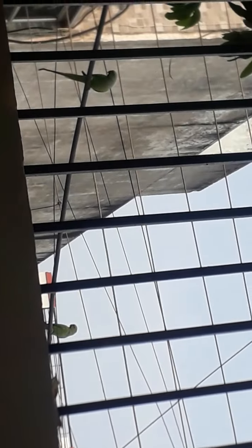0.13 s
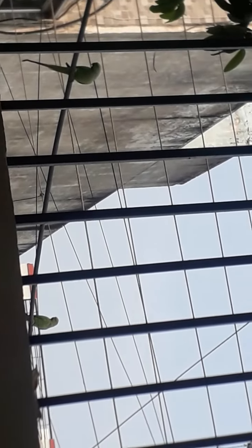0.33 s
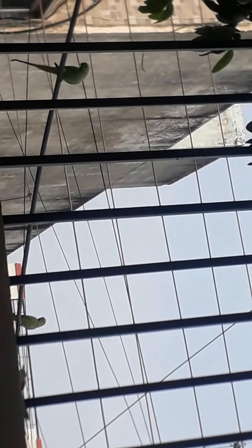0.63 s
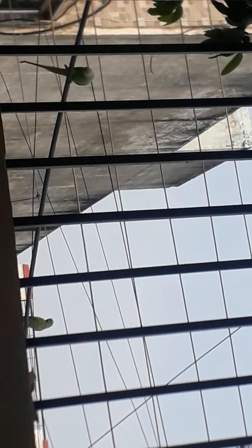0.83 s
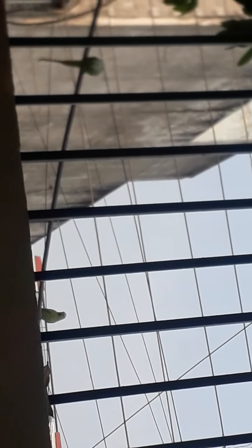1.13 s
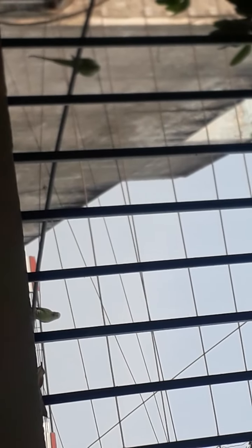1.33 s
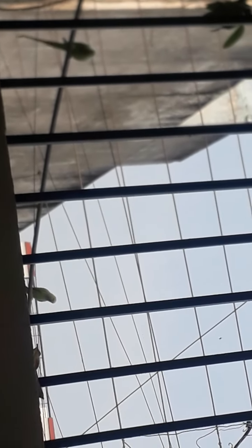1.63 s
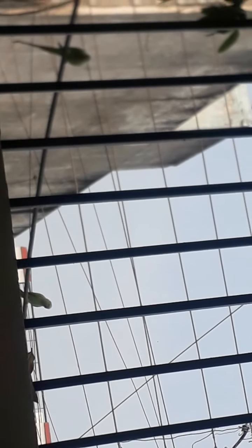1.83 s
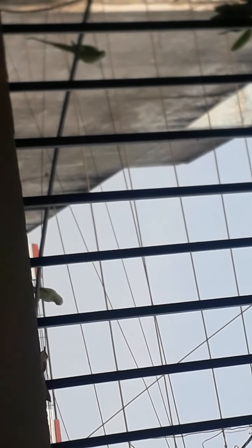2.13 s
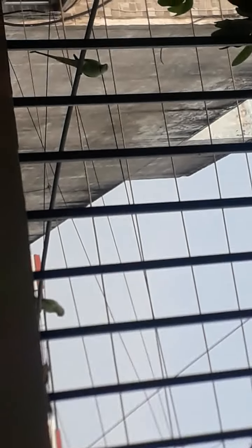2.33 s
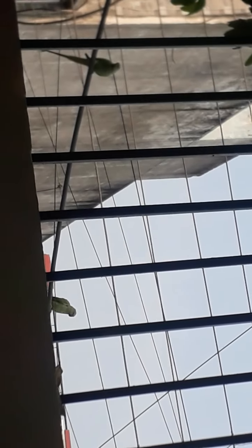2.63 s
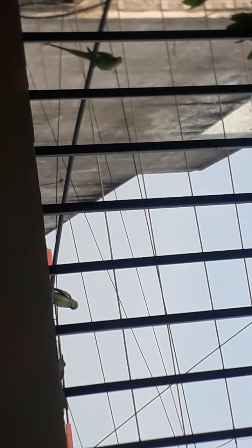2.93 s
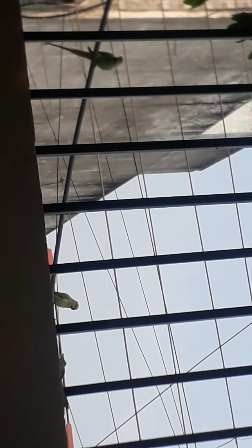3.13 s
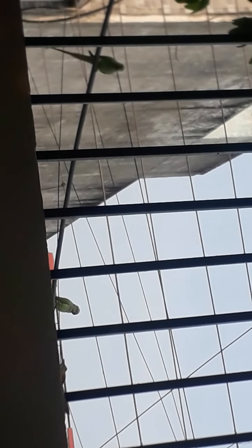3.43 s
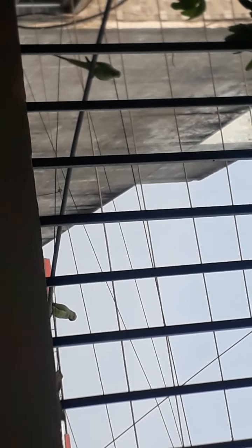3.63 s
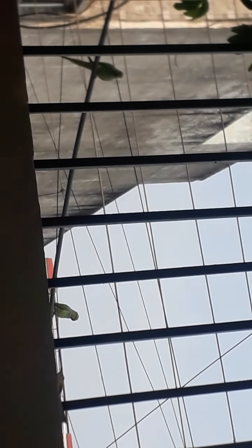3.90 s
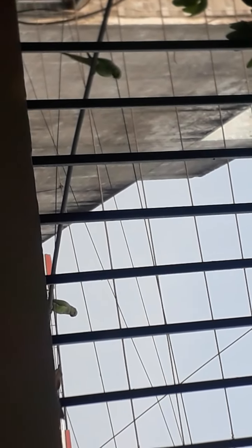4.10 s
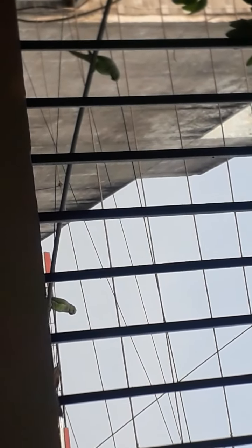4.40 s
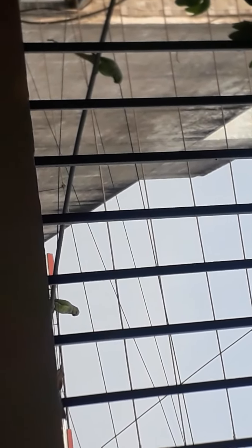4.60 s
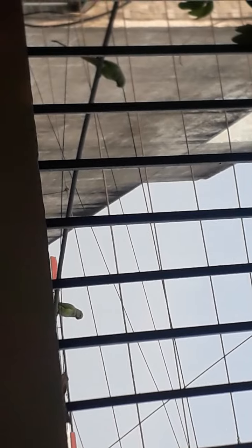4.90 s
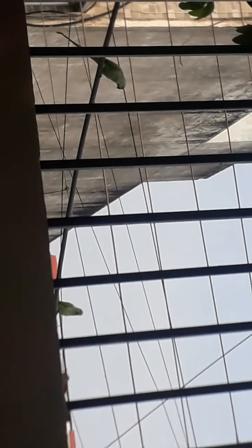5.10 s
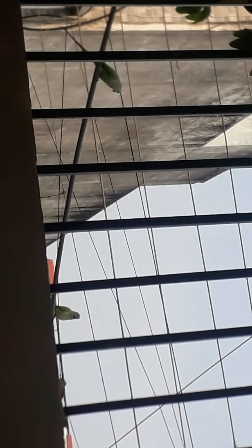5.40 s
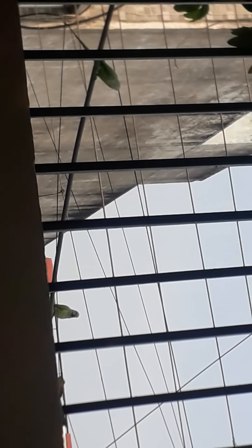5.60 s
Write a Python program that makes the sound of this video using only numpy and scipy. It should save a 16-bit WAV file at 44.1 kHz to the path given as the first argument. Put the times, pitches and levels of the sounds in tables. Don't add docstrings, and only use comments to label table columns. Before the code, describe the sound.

A parakeet gives harsh, shrill squawks in quick runs, ringing off concrete walls over a low town rumble with passing cars.

```python
import sys
import numpy as np
from scipy import signal
from scipy.fft import rfft, irfft
from scipy.io import wavfile
from scipy.ndimage import uniform_filter1d

SR = 44100
rng = np.random.default_rng(int(sys.argv[2]) if len(sys.argv) > 2 else 0)


def gain_from_db(level_db):
    decades = np.asarray(level_db, float) / 20
    return 10 ** decades


def transcribe(u):
    v = np.clip(np.atleast_2d(u).T, -1, 1)
    q = np.round(v * 32767).astype(np.int16)
    wavfile.write(sys.argv[1], SR, q)


N = 253575
TIME = np.arange(N) / SR

# f/Hz, level/dB per Hz
WASH_COLOUR = [(22, -26), (40, -7), (55, -11), (85, 3.5), (200, -7), (500, -16), (1200, -6.5), (2400, -14),
               (3000, -20), (4500, -24.5), (6200, -21.5), (7800, -38), (10000, -36.5), (15500, -31.5)]
# f/Hz, level/dB per Hz
TYRE_COLOUR = [(90, -20), (180, -0.5), (500, -6), (900, -10), (2000, -54)]
# t/s, rise/dB, half length/s
CARS = [
    (.4, 2.5, 0.15),
    (1.75, 1.5, 0.27),
    (2.7, 5.5, 0.34),
    (3.302, 2.5, 0.37),
    (4.4, 5, 0.38),
    (5.15, 3.5, 0.21),
]
# f/Hz, level/dB
SHAFT_TONES = [(954, -69), (1168.5, -64), (2337, -64)]
# f/Hz, level at full load/dB
LOAD_TONES = [(2950, -76), (3327, -74), (3505, -75), (3637, -65), (3702, -66.5), (4678, -84)]
# t/s, level/dB
SHAFT_LOAD = [(.4, -4.5), (.85, -9.5), (1.0, -25), (1.2, -22), (2.1, -5.5), (2.8, -2), (3.6, -16),
              (5.4, -12), (5.55, -22)]
# f/Hz, level/dB per Hz
HISS_COLOUR = [(210, -49), (350, -31), (412, -3), (499, -16), (701, 1.5), (789, -2.5), (1810, 0),
               (4080, -14), (5700, -7), (6540, -7.5), (7930, -31.5), (12000, -49), (15600, -80),
               (22000, -120)]
# edge f/Hz, extra fall/dB per s
HISS_DULLING = (3200, 15.7)
# t of top pitch/s, top to end/s, top f/Hz, shelf f/Hz, effort level/dB
PLAIN_SQUAWKS = [
    (1.489, .109, 2573, 1929, -21),
    (1.812, 0.098, 2485, 1843, -23),
    (3.164, .119, 2632, 2192, -21.5),
    (3.452, 0.11, 2700, 2110, -21),
    (3.726, 0.11, 2585, 2053, -21),
    (3.997, 0.11, 2634, 2078, -21),
    (4.264, 0.11, 2585, 2024, -21),
    (4.764, .098, 2613, 2075, -22.5),
    (5.021, 0.11, 2583, 2018, -22),
    (5.611, .107, 2500, 2090, -21),
]
# t/s, f/Hz, effort level/dB
BROKEN_NOTES = [
    [(1.165, 883, -30), (1.172, 1416, -25.5), (1.183, 2273, -19.5), (1.196, 2670, -37)],
    [(1.199, 3760, -28), (1.208, 3610, -24), (1.217, 3600, -25)],
    [(1.217, 2697, -24), (1.24, 2630, -23), (1.262, 2250, -20), (1.279, 1927, -16), (1.291, 1830, -23),
     (1.308, 1425, -24)],
    [(2.8, 949, -34.5), (2.808, 1445, -33.5), (2.82, 2136, -20.5), (2.832, 2950, -22)],
    [(2.832, 3980, -22), (2.842, 4045, -20), (2.86, 4050, -22), (2.878, 4070, -18), (2.888, 4090, -19)],
    [(2.882, 2758, -28), (2.93, 2755, -24), (2.958, 2598, -26.5)],
    [(2.958, 2555, -25.5), (2.98, 2296, -28.5), (3.005, 2060, -30)],
]
BROKEN_RASP = [1.2, 1.6, 1.6, 1.2, .9, 1.5, 4]
# time before top/s, share of top f, level over effort/dB
CLIMB = [(.038, .41, -13), (.025, .68, -10), (.016, .91, 2.5), (.007, .985, 2)]
# time/s, share of top f, level over effort/dB
SHOULDER = (.009, .96, 2.5)
# top to shelf/s, level choked at top/dB, share of shelf f halfway, before closing, at end,
# level before closing/dB, level at end/dB
SAG_FACING = (.023, -4, .97, .825, .66, -3, -22)
SAG_ASIDE = (.025, -7, .92, .825, .645, -3.5, -11)
# first t/s, gap/s, gap growth/s, share of f lost, share kept at each beat
TRILLS = [
    (1.227, .011, -.001, .2, .68),
    (2.886, .0152, .0036, .33, .97),
]
TRILL_BEATS = [4, 5]
SAG_WIDTH = [.29, .36]
# f/Hz, level/dB
THROAT_FACING = [(800, -48), (1400, -18), (1900, -15.5), (2500, -12), (2950, -9.5), (3500, -11),
                 (4700, -19), (5450, -2.5), (6500, -2), (7500, -16.5), (8500, -27), (10000, -35.5),
                 (11500, -25.5), (15500, -47.5)]
# f/Hz, level/dB
THROAT_ASIDE = [(800, -26.5), (1500, -19), (2000, -17), (2450, -12.5), (2900, -15), (3700, -13),
                (4600, -17), (5400, -12.5), (6150, 0.5), (7000, -12), (7700, -29), (9700, -30.5),
                (11800, -38.5), (15500, -46)]
# f/Hz, half width/Hz, level when wide/dB, voice f shut/Hz, voice f wide/Hz
BEAK = (4727, 870, 12.35, 1560, 2410)
# f/Hz, level/dB
BREATH_LIFT = [(6500, 6), (8000, 10.5), (15500, -11)]
# f/Hz, level sent back/dB
WALL_COLOUR = [(500, 13.5), (1500, -3), (3500, 3), (6000, -10), (8000, 0), (11000, -2), (16000, -15.5)]
# f/Hz, T60/s
WALL_T60 = [(500, .9), (2500, .8), (6000, .7), (8000, .5), (11000, .36), (14000, .3)]
# delay/s, level/dB
ECHOES = [
    (.003, -16.5),
    (.007, -12.5),
    (.013, -9.5),
]
# f/Hz, level/dB
OPPOSITE_COLOUR = [(1200, -40), (2600, -24), (3300, -1), (4200, -20), (7000, -44)]
# t/s, level/dB, half length/s
SCRAPE = (2.703, -72, .008)
# t on/s, length/s, level/dB
DRONE_BURSTS = [
    (4.45, 0.24, -58.5),
    (4.88, 0.32, -58),
    (5.3, 0.28, -61.5),
]

TURN_S = 2.4
FAINT_DB = -24


def colour_db(hz, table):
    f, v = np.transpose(table)
    return np.interp(np.log(np.maximum(hz, 1)), np.log(f), v)


def curve(table):
    return np.interp(TIME, *np.transpose(table))


def coloured(x, table):
    size = 2 ** int(np.ceil(np.log2(len(x))))
    hz = np.arange(size // 2 + 1) * SR / size
    return irfft(rfft(x, size) * gain_from_db(colour_db(hz, table)), size)[:len(x)]


def noise_band(count, hz, edge, skirt):
    shape = [(hz / skirt, -40), (hz / edge, -3), (hz, 0), (hz * edge, -3), (hz * skirt, -40)]
    return coloured(rng.standard_normal(count), shape)


def unit(x):
    return x / np.sqrt(np.mean(x ** 2))


def walk(rate_hz):
    k = int(SR / rate_hz)
    steps = np.repeat(rng.standard_normal(N // k + 1), k)
    return unit(uniform_filter1d(uniform_filter1d(steps, k), k)[:N])


def held(on_s, long_s, db, rise_db_s, fall_db_s):
    before_s = np.maximum(on_s - TIME, 0)
    after_s = np.maximum(TIME - on_s - long_s, 0)
    return db - rise_db_s * before_s - fall_db_s * after_s


def restless(table, swell_db, flicker_db, quiet_db=-99):
    out = 0
    centres_hz = 30 * 2. ** np.arange(10)
    for hz in centres_hz[colour_db(centres_hz, table) > quiet_db]:
        band = unit(noise_band(N, hz, np.sqrt(2), 2)) * np.sqrt(hz)
        motion_db = swell_db * walk(1.51) + flicker_db * walk(10)
        out = out + band * gain_from_db(min(1, 2500 / hz) * motion_db)
    return unit(coloured(out, table))


def town_wash():
    return gain_from_db(-52.5 - 2.5) * restless(WASH_COLOUR, swell_db=0.43, flicker_db=1.0)


def traffic():
    level_db = -55.5 - 3.5
    for s, db, half_s in CARS:
        level_db = level_db + db * np.exp(-((TIME - s) / half_s) ** 2)
    return gain_from_db(level_db) * restless(TYRE_COLOUR, 1.0, 1.75, FAINT_DB)


def whine():
    turns = 2 * np.pi * np.cumsum(1 + 0.000555 * walk(4.88)) / SR

    def ring(table):
        return sum(gain_from_db(db + hz / 1200 * walk(14)) * np.sin(hz * turns) for hz, db in table)

    return np.sqrt(2) * (ring(SHAFT_TONES) + gain_from_db(curve(SHAFT_LOAD)) * ring(LOAD_TONES))


def far_hiss():
    level_db = held(on_s=0.065, long_s=0.12, db=-37.5, rise_db_s=180, fall_db_s=46.5)
    hiss = gain_from_db(level_db) * restless(HISS_COLOUR, 0.85, 1.0, 2 * FAINT_DB)
    edge_hz, dulling_db_s = HISS_DULLING
    treble = coloured(hiss, [(edge_hz / 1.3, -40), (edge_hz * 1.3, 0)])
    return hiss + treble * (gain_from_db(1.5 - dulling_db_s * TIME) - 1)


def squawk(top_s, tail_s, top_hz, shelf_hz, db):
    sag = SAG_FACING if top_s < TURN_S else SAG_ASIDE
    drop_s, top_db, half, late, end, late_db, end_db = sag
    past_s, past_share, past_db = SHOULDER
    knee_s = top_s + drop_s
    close_s = top_s + tail_s - .018
    climb = [(top_s - s, share * top_hz, db + over_db) for s, share, over_db in CLIMB]
    return climb + [
        (top_s, top_hz, db + top_db),
        (top_s + past_s, past_share * top_hz, db + past_db),
        (knee_s, shelf_hz, db + 0.5),
        ((knee_s + close_s) / 2, half * shelf_hz, db),
        (close_s, late * shelf_hz, db + late_db),
        (top_s + tail_s, end * shelf_hz, db + end_db)]


def trills():
    left = np.ones(N)
    for (s, gap_s, grows_s, lost, kept), beats, width in zip(TRILLS, TRILL_BEATS, SAG_WIDTH):
        for k in range(beats):
            at_s = s + k * gap_s + k * (k - 1) / 2 * grows_s
            half_s = width * (gap_s + (k - 1) * grows_s)
            left = left * (1 - lost * kept ** k * np.exp(-((TIME - at_s) / half_s) ** 2))
    return left


def breath_noise(throat):
    return unit(coloured(coloured(rng.standard_normal(N), throat), BREATH_LIFT))


def parakeets():
    lead_s, catch_s, catch_rough = .008, .012, 5.44
    shimmer_db, shimmer_rise_db = 0.5, 0.74
    slope_db, thin_db, breath_db = -0.46, -2.5, -20
    sag = trills()
    kick = gain_from_db(.06 * SR * np.gradient(sag) + 16 * (1 - sag))
    wobble = .0075 * walk(600)
    flutter = [walk(200) for _ in range(4)]
    breath_facing, breath_aside = breath_noise(THROAT_FACING), breath_noise(THROAT_ASIDE)
    beak_hz, half_hz, beak_db, shut_hz, wide_hz = BEAK
    notes = [squawk(*row) for row in PLAIN_SQUAWKS] + BROKEN_NOTES
    rasps = [1] * len(PLAIN_SQUAWKS) + BROKEN_RASP
    voice = np.zeros(N)
    for note, rasp in zip(notes, rasps):
        s, hz, db = np.transpose(note)
        facing = s[0] < TURN_S
        throat = THROAT_FACING if facing else THROAT_ASIDE
        breath = breath_facing if facing else breath_aside
        from_rest = hz[0] < 1500
        start_s = s[0] - from_rest * lead_s
        span = slice(int(start_s * SR), int(s[-1] * SR))
        t = TIME[span]
        pitch = uniform_filter1d(np.interp(t, s, hz), int(.008 * SR), mode="nearest")
        slack = from_rest * np.exp(-((t - start_s) / (lead_s + catch_s)) ** 2)
        rough = rasp * (1 + catch_rough * slack)
        pitch = pitch * np.where(pitch < 3200, sag[span], 1) * np.exp(rough * wobble[span])
        fade = np.clip(np.minimum(t - start_s, s[-1] - t) / .003, 0, 1)
        gate = gain_from_db(np.interp(t, s, db)) * kick[span] * fade
        phase = 2 * np.pi * np.cumsum(pitch) / SR
        gape = np.clip((pitch - shut_hz) / (wide_hz - shut_hz), 0, 1)
        for k in range(1, 13):
            partial_hz = k * pitch
            uneven_db = (shimmer_db + shimmer_rise_db * min(k, 6)) * flutter[k % 4][span]
            ring_db = gape * beak_db * np.exp(-((partial_hz - beak_hz) / half_hz) ** 2)
            tilt_db = slope_db * k + thin_db * gape ** 4 * np.clip(k - 2, 0, 1)
            gain = gain_from_db(colour_db(partial_hz, throat) + ring_db + tilt_db + uneven_db)
            gain = gain * (partial_hz < 15600)
            voice[span] += np.sqrt(2) * gate * (1 - 0.59 * slack) * gain * np.sin(k * phase)
        voice[span] += gain_from_db(breath_db) * rough * gate * breath[span]
    return voice


def delayed(x, delay_s):
    return np.pad(x, (int(delay_s * SR), 0))[:N]


def yard(x):
    wet_db, build_s = -3, 0.0089
    t = TIME[:int(1.1 * SR)]
    tail = 0
    for hz in 500 * 2 ** np.arange(0, 5.1, .5):
        band = noise_band(len(t), hz, 1.19, 1.6)
        tail = tail + band * gain_from_db(-60 * t / colour_db(hz, WALL_T60))
    tail = tail * (1 - np.exp(-t / build_s))
    response = gain_from_db(wet_db) * coloured(tail / np.sqrt(np.sum(tail ** 2)), WALL_COLOUR)
    wet = signal.fftconvolve(x, response)[:N]
    wet = np.interp(TIME + .00017 * walk(40), TIME, wet)
    near = x + sum(gain_from_db(db) * delayed(x, late_s) for late_s, db in ECHOES)
    opposite = coloured(delayed(x, .073), OPPOSITE_COLOUR)
    return near + opposite + wet


def scrape():
    s, db, half_s = SCRAPE
    colour = [(9500, -40), (11500, 1.0), (13000, 0), (15000, -30)]
    noise = unit(coloured(rng.standard_normal(N), colour))
    return gain_from_db(db) * np.exp(-((TIME - s) / half_s) ** 2) * noise


def drone():
    hz, fade_db_s = 292, 302
    level = sum(gain_from_db(held(*row, fade_db_s, fade_db_s)) for row in DRONE_BURSTS)
    phase = 2 * np.pi * np.cumsum(hz * (1 + 0.00553 * walk(6))) / SR
    return np.sqrt(2) * level * np.sin(phase)


def scene():
    birds = yard(parakeets()) * gain_from_db(-1.5)
    machines = whine() + drone()
    town = town_wash() + traffic() + far_hiss()
    return (birds + machines + town + scrape())[None]


def roll_off(x):
    return signal.sosfilt(signal.butter(12, 15810, fs=SR, output="sos"), x)


def record(dry):
    mix = dry - .0006
    return roll_off(mix)


dry = scene()
out = record(dry)
transcribe(out)
```